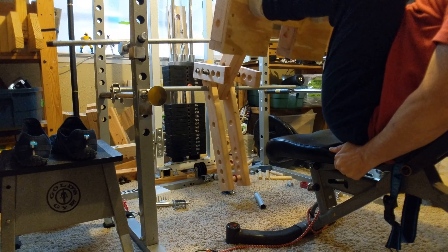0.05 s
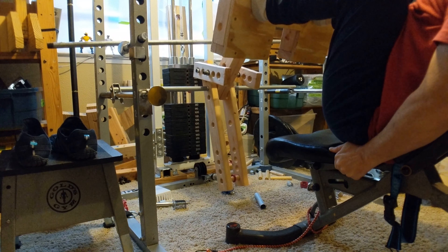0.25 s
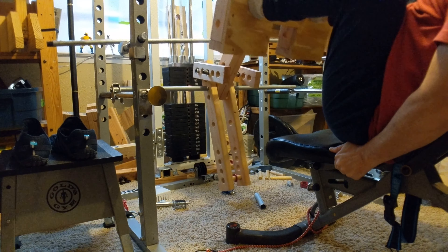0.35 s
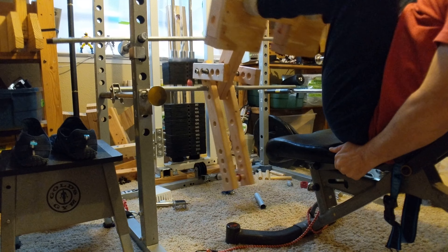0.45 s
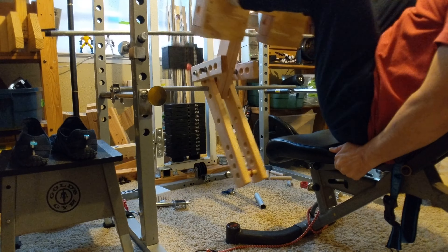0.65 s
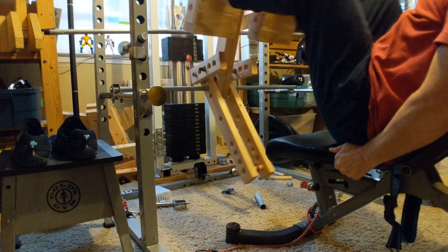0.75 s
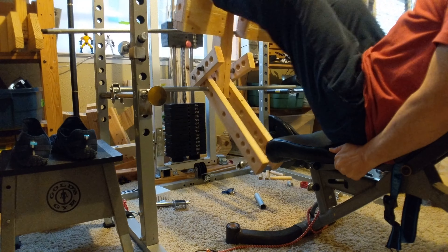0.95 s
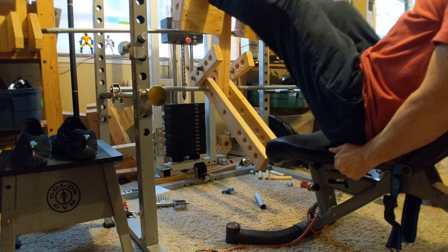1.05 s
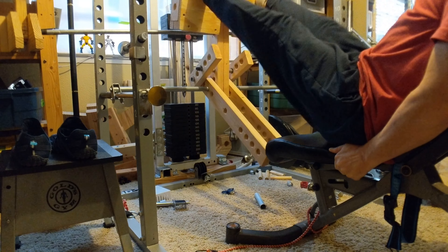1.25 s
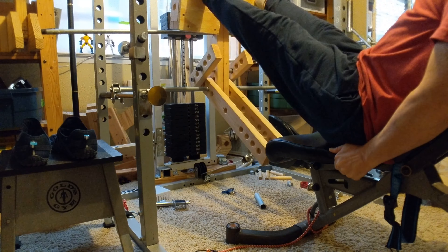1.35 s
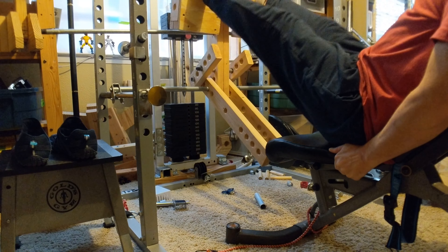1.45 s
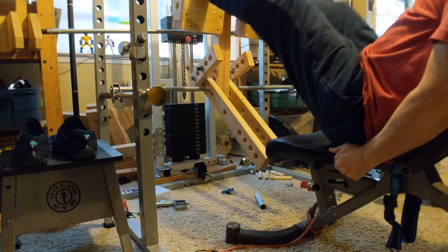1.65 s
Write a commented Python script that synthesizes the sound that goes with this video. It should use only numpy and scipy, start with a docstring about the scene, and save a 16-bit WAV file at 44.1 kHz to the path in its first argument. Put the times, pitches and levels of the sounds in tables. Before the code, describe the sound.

A bright steel clank rings out, then ticks, a hard clack and dull wooden knocks

```python
"""A few small ticks of loose parts over quiet room tone and a low rustle, then a homemade leg-press rig in a
small cluttered room: a steel part clanks and rings on, ticks and rattles go by, then a hard clack and dull
wooden knocks. Contacts are shaped clicks heard mostly through a short dense echo; the rings are sums of
damped sine modes, heard mostly direct; room tone and rustle are coloured noise."""
import sys
import numpy as np
from scipy import signal
from scipy.fft import rfft, irfft, next_fast_len
from scipy.io import wavfile
from scipy.ndimage import map_coordinates

SR = 44100
rng = np.random.default_rng(int(sys.argv[2]) if len(sys.argv) > 2 else 0)


def generate_wav(signal):
    """Clip the signal to [-1, 1] and save it as 16-bit WAV at the path in sys.argv[1]."""
    frames = np.transpose(np.atleast_2d(signal))
    scaled = np.clip(frames, -1, 1) * 32767
    pcm = np.round(scaled).astype(np.int16)
    wavfile.write(sys.argv[1], SR, pcm)


N = 74970  # length in samples

DIRECT_DB = -13  # direct sound of the larger contacts, against their echo at 0 dB
METAL_ROOM_DB = -17  # echo of the metal rings, against their direct sound at 0 dB


def amp(db):
    """Decibels to gain."""
    return 10 ** (np.asarray(db) / 20)


def along(points, hz):
    """Read a curve of (frequency, value) points on a log frequency axis."""
    f, v = np.transpose(points)
    return np.interp(np.log(hz + 1), np.log(f + 1), v)


def add(track, s, sound):
    """Mix a sound into the track at time s, cut off at the track's end."""
    part = track[round(s * SR):][:len(sound)]
    part += sound[:len(part)]


def noise(colour):
    """Steady noise of rms 1, white noise filtered to the given colour."""
    hz = np.fft.rfftfreq(N, 1 / SR)
    coloured = irfft(rfft(rng.standard_normal(N)) * amp(along(colour, hz)), N)
    return coloured / np.sqrt(np.mean(coloured ** 2))


# Countless small modes make every click's spectrum jagged: depth, spacing, frequency of half depth
JAG_DB, JAG_HZ, JAG_FROM_HZ = 6, 45, 900


def click(db_of_hz, size=4096):
    """A minimum-phase click of energy 1: all its sound follows the impact, none precedes it."""
    hz = np.fft.rfftfreq(size, 1 / SR)
    knots = np.arange(0, SR / 2 + JAG_HZ, JAG_HZ)
    jag = np.interp(hz, knots, rng.standard_normal(len(knots)))
    jag_db = JAG_DB * hz / (hz + JAG_FROM_HZ) * jag
    cepstrum = irfft(np.log(amp(db_of_hz(hz) + jag_db) + 1e-6), size)
    # Folding the cepstrum onto positive time makes the click causal
    cepstrum[1:size // 2] *= 2
    cepstrum[size // 2 + 1:] = 0
    pulse = irfft(np.exp(rfft(cepstrum)), size)
    return pulse / np.linalg.norm(pulse)


WAVER_DB, WAVER_RATE = 2, 22  # each mode swells and sags on its own: depth, random knots a second


def ring(modes, rise_s, seconds=1):
    """Damped sine modes that build up together, with levels and phases new at every blow."""
    t = np.arange(int(seconds * SR)) / SR
    hz, db, t60 = np.transpose(modes)[..., None]
    level_change_db, phase_cycles = rng.standard_normal((2, len(modes), 1))
    knots = np.arange(int(seconds * WAVER_RATE) + 2) / WAVER_RATE
    knot_values = rng.standard_normal((len(modes), len(knots)))
    waver = np.array([np.interp(t, knots, row) for row in knot_values])
    envelope = amp(db + level_change_db + WAVER_DB * waver - 60 * t / t60)
    waves = envelope * np.sin(2 * np.pi * (hz * t + phase_cycles))
    return waves.sum(0) * (1 - np.exp(-t / rise_s))


# Decay of the small room at full echo length: pitch_hz, t60_s
ROOM_DECAY = [(60, 0.39), (250, 0.47), (500, 0.22), (1500, 0.3), (4000, 0.23), (8000, 0.22), (15000, 0.09)]
ROOM_RISE_S = 0.0016


def room(x, length):
    """A fresh dense noise echo of energy 1; each frequency dies at its own speed."""
    hz, t, bands = signal.stft(rng.standard_normal(SR // 2), SR, nperseg=256)
    t60 = length * along(ROOM_DECAY, hz)[:, None]
    tail = signal.istft(bands * amp(-60 * t / t60), SR, nperseg=256)[1]
    tail = tail * (1 - np.exp(-np.arange(len(tail)) / SR / ROOM_RISE_S))
    return signal.fftconvolve(x, tail / np.linalg.norm(tail))


def heard(x, wet_db=0, direct_db=0, length=1):
    """Direct sound plus the room's echo; length scales the echo's decay times."""
    wet = amp(wet_db) * room(x, length)
    return wet + amp(direct_db) * np.pad(x, (0, len(wet) - len(x)))


# Colour of the room tone: pitch_hz, relative_level_db (per Hz)
TONE_COLOUR = [(24, -48), (40, -1.5), (134, 1.5), (245, -12), (366, -7), (976, -11.5), (1880, -20.5),
               (2020, -23.5), (3990, -19), (14000, -25.5), (16300, -28)]
TONE_DB = -60


def room_tone():
    """Quiet steady noise, strongest in the bass."""
    return amp(TONE_DB) * noise(TONE_COLOUR)


# Slow swell of the moving rig's rustle: time_s, level_db (before flutter)
RUSTLE_SWELL = [(0.0, -63), (0.298, -53), (.75, -54.5), (.88, -63), (0.999, -56.5), (1.7, -63.5)]
# Colour of the rustle: pitch_hz, relative_level_db (per Hz)
RUSTLE_COLOUR = [(60, -43), (120, -5), (500, -5), (1000, -10), (2500, -16.5), (5000, -27), (9000, -52.5)]
FLUTTER_DB, FLUTTER_RATE = 2.5, 25  # depth, random knots a second


def rustle():
    """Low coloured noise of the moving rig, its level drawn over time with a random flutter."""
    t = np.arange(N) / SR
    s, db = np.transpose(RUSTLE_SWELL)
    knots = rng.standard_normal(int(N * FLUTTER_RATE / SR) + 4)
    flutter = map_coordinates(knots, [t * FLUTTER_RATE])  # smooth curve through the knots
    return amp(np.interp(t, s, db) + FLUTTER_DB * flutter) * noise(RUSTLE_COLOUR)


# Ticks, rattles and bumps of loose parts: start_s, level_db, centre_hz, half_width_octaves (to -6 dB)
TICKS = [(0.036, -28.5, 1860, 1.55), (.127, -34.5, 1200, 1.5), (.167, -20, 2700, 0.94),
         (.166, -18, 2600, 0.13), (0.17, -11.5, 1435, 0.43), (.213, -13, 2570, 0.78),
         (0.206, -16, 2450, 0.16), (0.205, -19, 4500, 0.045), (.31, -26, 63.5, 0.55),
         (0.401, -19.5, 980, 0.78), (.44, -18, 1110, 1.1), (0.466, -13.5, 4000, 0.76),
         (0.516, -14.5, 1620, 0.63), (.617, -19, 1950, 0.92), (0.651, -21.5, 1290, 1.47),
         (.645, -27.5, 4450, 0.019), (0.654, -38.5, 8280, .004), (.745, -28.5, 1170, 1.27),
         (.775, -35.5, 667, 2), (.938, -20.5, 194, 0.74), (0.945, -28.5, 1620, 0.17),
         (0.951, -27.5, 2800, 0.66), (1.226, -35.5, 477, 0.5), (1.248, -29.5, 520, 0.69),
         (1.393, -14.5, 3250, 0.58), (1.422, -31, 8600, 0.54), (1.596, -31, 1070, 0.35)]
TICK_DIRECT_DB = -5.5  # direct sound against the echo


def ticks():
    """Small contacts, each a click around its own pitch: narrow ones ping, wide ones tick."""
    out = np.zeros(N)
    for s, db, centre_hz, octaves in TICKS:
        def bump(hz):
            distance = np.log2((hz + 1) / centre_hz) / octaves
            return np.maximum(-6 * distance ** 2, -60)
        add(out, s, amp(db) * heard(click(bump), 0, TICK_DIRECT_DB))
    return out


# Wooden knocks: start_s, level_db, softness_cutoff_hz
KNOCKS = [(1.027, -24, 636), (1.039, -24.5, 674), (1.058, -30, 695), (1.075, -40, 1180), (1.11, -29.5, 524),
          (1.309, -32, 450), (1.313, -27.5, 546), (1.322, -31.5, 615), (1.394, -22.5, 3900),
          (1.412, -25.5, 1515), (1.436, -36, 1220), (1.643, -47.5, 610)]
# Modes of the wooden beams before softening: pitch_hz, level_db, t60_s
WOOD = [(207, -15, 0.1), (351.6, -2, 0.067), (389, -3, 0.072), (520, 1, 0.053), (563.4, -1.5, 0.13),
        (692, -2, 0.083), (775, -1, 0.068), (881, -3.5, 0.06), (1060, -12.5, 0.068), (1320, -11, 0.12),
        (1399, -14.5, 0.12), (1824, -7.5, 0.023)]
# Colour of the knock's crack before softening: pitch_hz, relative_level_db (per Hz)
KNOCK_CRACK = [(24, -36), (40, -19), (220, -20.5), (392, 2), (615, -4.5), (1680, -8), (1850, -14),
               (2210, -13.5), (3470, -15), (16000, -84)]
KNOCK_CRACK_DB, WOOD_ROOM_DB = 19, -8  # crack against the knock's level; echo of the wood ring
CONTACT_CYCLES = 1.2  # rise of the wood ring, in cycles of the softness cut-off
KNOCK_ECHO = 0.7  # echo length over that of the room
SHAKE_DB, SHAKE_HZ = -12, 2800  # steel ring against the knock's level; only modes above this are shaken


def knocks():
    """Beams knock; soft contacts lose their treble, hard ones also shake the steel frame."""
    out = np.zeros(N)
    shaken = [mode for mode in STEEL if mode[0] > SHAKE_HZ]
    for s, db, soft_hz in KNOCKS:
        def dull(hz):
            return -10 * np.log10(1 + (hz / soft_hz) ** 6)

        def soften(modes):
            return [(hz, level + dull(hz), t60) for hz, level, t60 in modes]

        wood = ring(soften(WOOD), CONTACT_CYCLES / soft_hz, seconds=.3)
        crack = click(lambda hz: along(KNOCK_CRACK, hz) + dull(hz))
        add(out, s, amp(db) * heard(wood, WOOD_ROOM_DB, 0, KNOCK_ECHO))
        add(out, s, amp(db + KNOCK_CRACK_DB) * heard(crack, 0, DIRECT_DB, KNOCK_ECHO))
        add(out, s, amp(db + SHAKE_DB) * ring(soften(shaken), STEEL_RISE_S))  # no echo
    return out


# Hard bright clack, three contacts: start_s, crack_db, ring_db
CLACKS = [(1.012, 3, 0.5), (1.022, -1, -38), (1.04, -5.5, -11)]
# Colour of the clack's crack: pitch_hz, relative_level_db (per Hz)
CLACK_CRACK = [(350, 3.5), (600, -3.5), (881, -6.5), (1080, 2.5), (2040, -15), (2270, -11), (4400, -10.5),
               (4780, -11), (7520, -22), (15100, -34.5), (16000, -57.5)]
# Modes of the clack's short metallic ring: pitch_hz, level_db, t60_s
CLACK_RING = [(1026, -20.5, 0.049), (2318, -26.5, 0.067), (2746, -21.5, 0.034), (3495, -18, 0.03),
              (4645, -24.5, 0.061), (6020, -29, 0.043), (6675, -44, 0.36)]
CLACK_RISE_S = 0.0034


def clack():
    """Each contact is a bright crack with a short metallic ring."""
    out = np.zeros(N)
    colour = [(200, -47)] + list(CLACK_CRACK)  # keeps the bass out of the crack
    for s, db, ring_db in CLACKS:
        metal = ring(CLACK_RING, CLACK_RISE_S, seconds=.5)
        crack = click(lambda hz: along(colour, hz))
        add(out, s, amp(ring_db) * heard(metal, METAL_ROOM_DB))
        add(out, s, amp(db) * heard(crack, 0, DIRECT_DB))
    return out


# Steel part, three contacts in quick succession: start_s, crash_db
CLANKS = [(.238, 8), (.249, 6.5), (.259, 8)]
# Colour of the crash: pitch_hz, relative_level_db (per Hz)
CLANK_CRACK = [(24, -76), (40, -36), (433, -13), (542, -17), (715, -12.5), (1760, -29), (1950, 0),
               (2210, -5.5), (2700, -12.5), (4800, -17), (5180, -9.5), (6020, -23.5), (8340, -20.5),
               (16000, -34.5)]
# Modes of the long-ringing steel frame: pitch_hz, level_db, t60_s (before the touch)
STEEL = [(1064, -40, 0.5), (1653, -33, 0.35), (1862, -42, 1.52), (1896, -37, 1), (1995, -19, 0.37),
         (2038, -26, 0.6), (2150, -23, 0.45), (2213, -16, 0.32), (2449, -27, 0.44), (2905, -33, 0.92),
         (3396, -33, 1.3), (3528, -31, 0.43), (3915, -45, 1.1), (4461, -37, 0.5), (4971, -40, 0.76),
         (5031, -36, 0.55), (5628, -44, 0.62), (6249, -40, 0.39), (6907, -44, 0.5), (8240, -50, 0.9),
         (9657, -43, 0.48), (9823, -45, 0.45), (10351, -49, 0.58), (12970, -42, 0.25)]
# Modes of the quickly damped struck part: pitch_hz, level_db, t60_s
PLATE = [(1933, -18, 0.22), (2023, -26, 0.4), (2187, -17, 0.19), (2241, -15, 0.18), (2315, -28, 0.2),
         (2385, -28, 0.25), (2486, -19, 0.17), (2525, -21, 0.19), (2950, -17, 0.1), (3210, -23, 0.16),
         (4307, -27, 0.18), (4635, -24, 0.12), (5114, -16, 0.17), (5189, -19, 0.2), (5239, -27, 0.22),
         (5315, -26, 0.16), (5549, -22, 0.15), (6584, -20, 0.14), (6648, -32, 0.22), (7932, -26, 0.21),
         (8154, -23, 0.16), (8712, -32, 0.19), (11161, -30, 0.14)]
STEEL_DB, STEEL_RISE_S, PLATE_RISE_S = 1.5, 0.02, 0.024
# A touch on the frame damps its upper modes: when, their extra decay, lowest mode it reaches
TOUCH_S, TOUCH_T60_S, TOUCH_HZ = 0.57, 0.89, 1950


def clank():
    """Each contact crashes; the ring of part and frame builds up once, from the first."""
    out = np.zeros(N)
    start = CLANKS[0][0]
    since_touch = np.maximum(np.arange(SR) / SR + start - TOUCH_S, 0)
    lower = [mode for mode in STEEL if mode[0] < TOUCH_HZ]
    upper = [mode for mode in STEEL if mode[0] >= TOUCH_HZ]
    damping = amp(-60 * since_touch / TOUCH_T60_S)
    frame = ring(lower, STEEL_RISE_S) + ring(upper, STEEL_RISE_S) * damping
    plate = ring(PLATE, PLATE_RISE_S)
    add(out, start, heard(amp(STEEL_DB) * frame + plate, METAL_ROOM_DB))
    for s, db in CLANKS:
        crash = click(lambda hz: along(CLANK_CRACK, hz))
        add(out, s, amp(db) * heard(crash, 0, DIRECT_DB))
    return out


def scene():
    """All sources mixed to one channel, from the background to the clank."""
    return (room_tone() + rustle() + ticks() + knocks() + clack() + clank())[None]


TOP_HZ = 16450  # band limit


def record(dry):
    """Nothing is kept from the band limit up."""
    size = next_fast_len(N + SR // 2)
    kept = np.fft.rfftfreq(size, 1 / SR) < TOP_HZ
    return irfft(rfft(dry, size) * kept, size)[..., :N]


dry = scene()
out = record(dry)
generate_wav(out)
```